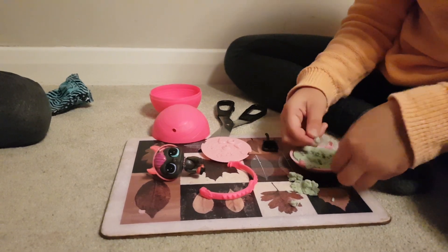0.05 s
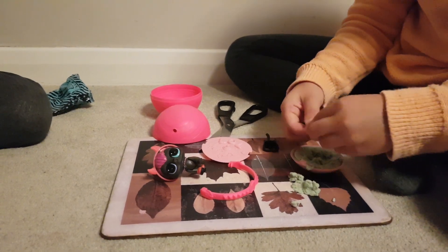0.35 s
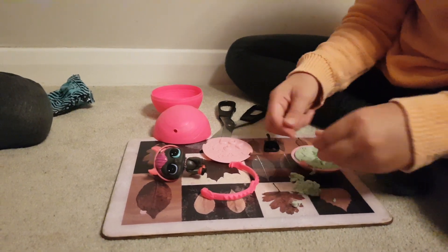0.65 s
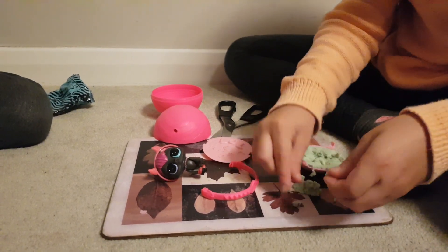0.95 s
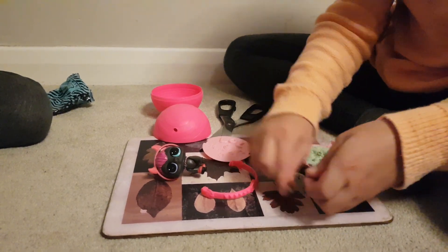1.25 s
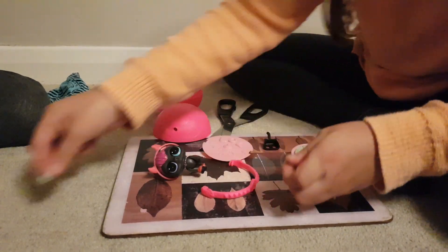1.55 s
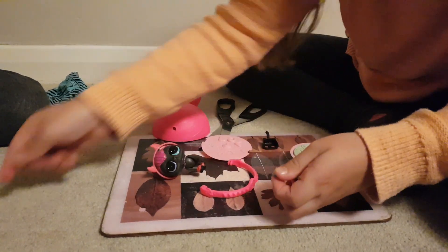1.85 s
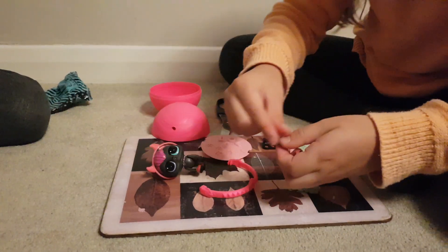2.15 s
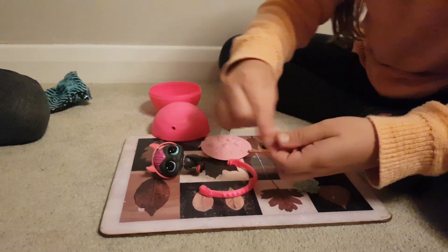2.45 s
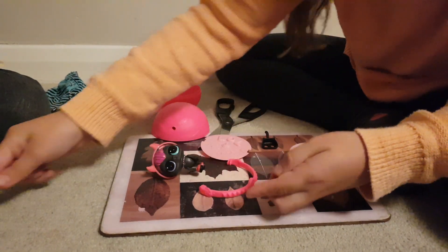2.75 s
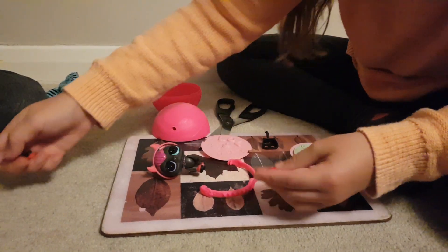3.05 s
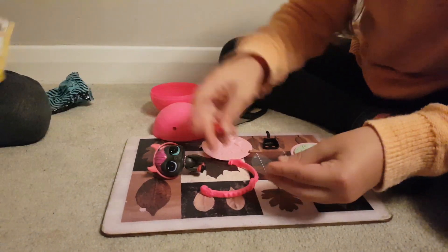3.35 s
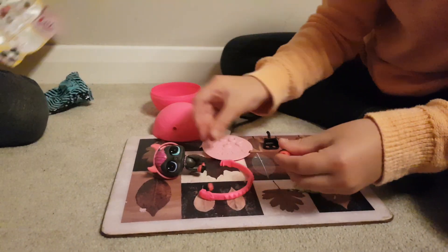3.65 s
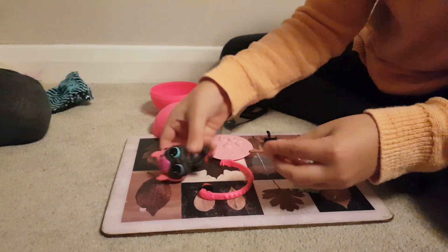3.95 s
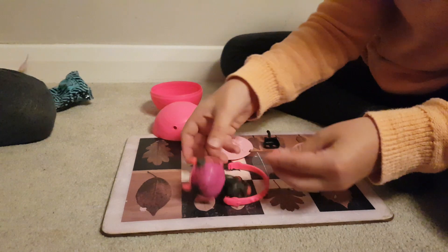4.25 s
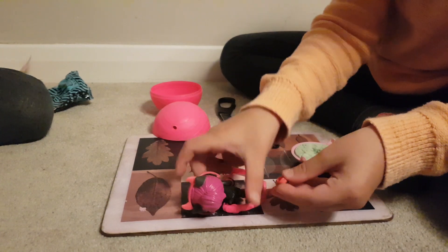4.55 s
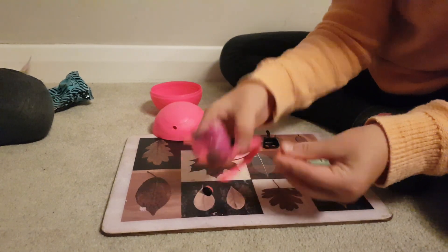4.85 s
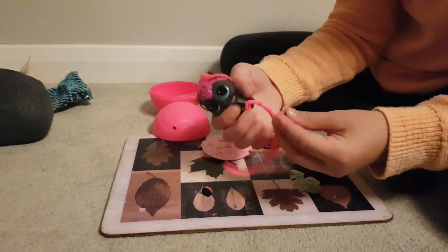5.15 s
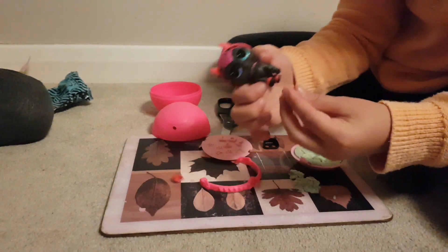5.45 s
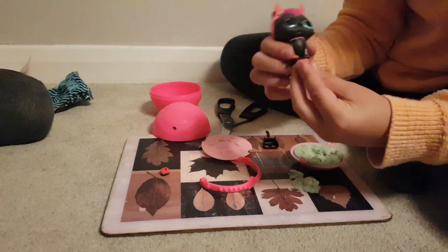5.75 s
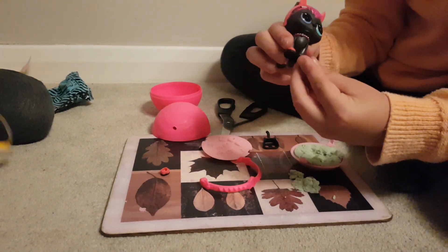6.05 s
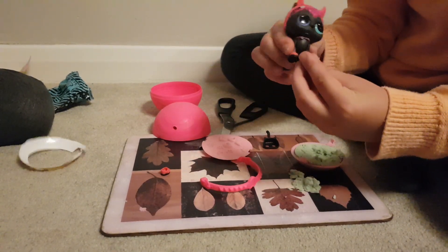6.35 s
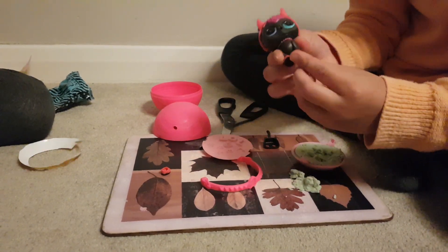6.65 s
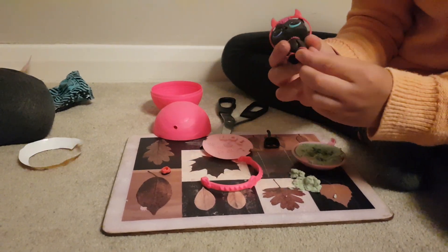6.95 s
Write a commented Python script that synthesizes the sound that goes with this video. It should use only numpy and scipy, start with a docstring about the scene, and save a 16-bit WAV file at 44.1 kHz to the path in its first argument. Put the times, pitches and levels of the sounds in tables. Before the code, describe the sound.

Soft sleeve rustle and sharp clicks of hollow plastic toys being handled, dragged and set down on a mat indoors.

```python
"""Plastic toys on a mat

Small hollow pieces are picked up, knocked together and set down on a mat on a carpeted floor. Each impact
excites the damped modes of shell and mat; dragged pieces scrape by stick and slip, and knitted sleeves
brush along. A phone close by hears it in a small, quiet room with a wall just behind."""
import sys
import numpy as np
from scipy import signal
from scipy.fft import rfft, irfft
from scipy.io import wavfile
from scipy.ndimage import map_coordinates

SR = 44100
rng = np.random.default_rng(int(sys.argv[2]) if len(sys.argv) > 2 else 0)


def transcribe(u):
    """Save the signal u as a 16-bit wav file named by the first command-line argument.

    u: samples, shape (n,) or (channels, n), limited to [-1, 1]; the rate is SR.
    q: integer samples, one column per channel.
    """
    v = np.clip(np.atleast_2d(u).T, -1, 1)
    q = np.round(v * 32767).astype(np.int16)
    wavfile.write(sys.argv[1], SR, q)


N = 313551
TIME = np.arange(N) / SR

# Spectral shapes of the noise sources: f/Hz, relative level/dB
RUMBLE_SPECTRUM = [(15, -21.5), (30, -6), (45, 3.5), (80, 2), (130, -5.5), (200, -23.5), (400, -30),
                   (900, -29), (2500, -42)]
MICROPHONE_SPECTRUM = [(200, 8.5), (700, 0), (1500, 2.5), (3200, 2), (5000, -1.5), (7000, -3.5), (9000, -1),
                       (12000, 3.5), (15500, -5)]
PAT_SPECTRUM = [(60, -25.5), (110, -12), (150, 3.5), (200, -5), (300, -5.5), (430, -18.5), (700, -16),
                (1400, -26.5), (4000, -50)]
SLEEVE_HISS_SPECTRUM = [(2500, -35), (4800, -12.5), (6200, -3), (7400, 1.5), (8500, -6), (9600, -4.5),
                        (12000, -9.5), (15500, -13)]
SLEEVE_RUB_SPECTRUM = [(500, -19.5), (1100, -10), (1800, -9), (2300, 2), (3700, 2), (4600, -6.5),
                       (7000, -32.5)]
SCRAPE_SPECTRUM = [(250, -23.5), (600, 3), (1100, -2), (1700, 3.5), (3100, -1.5), (4200, -6), (5300, -15),
                   (9000, -24.5), (15000, -22.5)]
# Reverberation bands: lower f/Hz, upper f/Hz, T60/s, relative level/dB
ROOM_BANDS = [(59.6, 300, 0.38, -2.5), (393, 1500, 0.26, 2), (1500, 8000, 0.24, -4),
              (4550, 19000, 0.27, -3.5)]
# Difference between the microphone ports for sound from the mat: f/Hz, left minus right/dB
PORT_DIFFERENCE = [(200, 0.5), (700, 1.5), (1300, 3), (2200, 4.5), (3100, 16.5), (4400, 8.5), (7000, 10.5),
                   (9200, -4.5), (11500, 0.5), (15000, 0.5)]
# Where the hands work: t/s, left lead/ms, extra left minus right/dB, mat frequency ratio, room send/dB
HAND_POSITIONS = [(0, .34, 1.5, 1.35, -7), (3.35, .29, 2, 0.99, -9), (3.58, .15, 2, 1.2, -19.5),
                  (4.13, 0.14, 1, 0.93, -14.5), (4.22, .012, 1, 1.62, -14.5), (4.34, .021, 1.5, .82, -16.5),
                  (5.29, .076, 1.5, 1.24, -15), (5.43, 0.0094, -1, 1.58, -15.5), (5.66, .11, 2, 2.4, -18)]
# Modes of the hollow plastic and of the mat on the carpet: f/Hz, resonance height/dB, T60/s
SHELL_MODES = [(730.4, -5, 0.016), (1395, -3.5, 0.0068), (1550, -6, 0.017), (1650, -6, 0.089),
               (2000, -6, 0.032), (1990, -1, 0.025), (2860, 0.5, 0.027), (3280, -5, 0.0044),
               (3700, 1.5, .018), (6470, -3.5, 0.0077), (7250, 1, 0.01), (8640, -3.5, 0.0084)]
MAT_MODES = [(86.45, -19, .12), (161, -1.5, 0.056), (228, -4.5, 0.029), (309.1, -9, 0.018)]
# A brief low groan: t/s, f/Hz, level/dB, second harmonic/dB re fundamental
GROAN_CONTOUR = [(2.28, 87.3, -68, -18), (2.31, 87.7, -53.5, -21), (2.35, 89.7, -46, -21),
                 (2.38, 76.3, -51, -9), (2.405, 81, -49, -4.5), (2.43, 73.3, -55, -27),
                 (2.46, 72, -58, -11)]
# Weight put on hands and knees: start t/s, duration/s, level/dB
WEIGHT_SHIFTS = [(-.03, 0.028, -44.5), (.53, 0.28, -67.5), (1.7, 0.014, -57), (2.21, 0.023, -59),
                 (3.045, .1, -51.5), (3.18, 0.071, -62), (3.48, 0.052, -52), (3.79, .25, -52),
                 (4.13, 0.098, -42), (4.3, 0.091, -51.5), (4.53, 0.067, -67.5), (4.72, 0.045, -61.5),
                 (5.3, 0.053, -50)]
# Arm movements: fastest at t/s, time scale/s, hiss level/dB, coarse rub/dB re hiss
ARM_MOVEMENTS = [(0.203, 0.14, -65, -6.5), (.37, 0.24, -66.5, -10), (0.686, 0.24, -69.5, 1),
                 (0.839, 0.085, -64, -15), (1.004, 0.16, -73, -4.5), (1.393, 0.14, -63, -3),
                 (1.57, 0.3, -73.5, -0.5), (1.847, 0.15, -66.5, -2.5), (2.604, 0.097, -66, -3.5),
                 (2.69, 0.069, -73.5, 3.5), (2.795, 0.16, -64, -2), (3.1, 0.087, -65.5, -12),
                 (3.179, 0.057, -60.5, 0.5), (3.316, 0.026, -54.5, -3), (3.441, 0.057, -59, 2),
                 (3.867, 0.15, -58.5, 0), (4.074, 0.11, -67.5, 2), (4.528, .28, -75.5, 4.5),
                 (6.11, 0.12, -72.5, -13), (6.39, 0.05, -72.5, -11.5)]
# Fingers rubbing a toy or the mat: centre t/s, half-amplitude duration/s, f/Hz, relative level/dB
FINGER_RUBS = [(.03, 0.06, 156, -56), (.732, .043, 3180, -58.5), (.78, 0.057, 195, -59.5),
               (1.116, .038, 1400, -66), (1.483, .022, 236, -64.5), (2.805, 0.018, 272, -59.5),
               (3.503, 0.0337, 172, -45), (4.715, 0.047, 1440, -54.5), (4.7, 0.02, 3970, -55.5),
               (5.194, .044, 3630, -70)]
# Plastic dragged over plastic and mat: start t/s, duration/s, level/dB
DRAGS = [(3.1, 0.18, -62.5), (3.52, 0.34, -55.5), (3.81, 0.27, -53.5), (4.305, 0.069, -45),
         (4.385, 0.074, -60), (4.565, 0.051, -64), (4.683, 0.085, -55), (4.835, 0.04, -64),
         (5.3, 0.026, -47), (5.435, 0.028, -41.5), (5.56, .09, -52.5), (5.66, 0.082, -72)]
# Soft bumps of a toy on the mat: t/s, strength/dB, hollow knock/dB re strength
MAT_BUMPS = [(.5021, -24, 7), (0.5467, -26, 16), (3.1118, -20.5, 4), (3.5207, -17.5, 7.5), (3.821, -16, 5),
             (3.8414, -16, 9), (3.9847, -14.5, 8)]
# Tiny hard parts and fingernails: t/s, strength/dB, hollow knock/dB, hard tick/dB (last two re strength)
SMALL_TICKS = [(.4106, -32.5, -5, 3), (1.3073, -37.5, 1, 5), (1.4853, -19.5, -19, -11),
               (1.5245, -19.5, -11, -11), (1.6685, -21.5, -4, -10), (2.4735, -24.5, -11, -19.5),
               (2.8382, -24.5, -21, -4.5), (2.9043, -23, -12, -8.5), (5.0109, -20, -28.5, -6.5),
               (5.0471, -23, -30.5, -8.5)]
# Plastic on plastic: t/s, strength/dB, ring f/Hz, hollow knock/dB, hard tick/dB, mat thump/dB
# (last three re strength)
TOY_IMPACTS = [(1.1327, -26, 2120, -4, -39, -21), (2.2086, -12.5, 3030, 1, -16, -1),
               (3.2144, 3.5, 2580, -11.5, -12.5, -8), (3.2789, -5, 2240, -6, -22, -20),
               (3.351, 3, 2870, -19, -13.5, -24), (3.5934, 14, 2900, -8, -32.5, -13),
               (3.657, 10.5, 2903, -11, -24, -18.5), (3.691, -10, 2000, -1, -24, -4),
               (3.708, 2, 2500, -8, -27.5, -18), (3.7359, -7.5, 2630, -3.5, -23, -28),
               (4.1325, 18, 2750, -13, -40, -14), (4.135, 3.5, 3000, -26, -6.5, 19.5),
               (4.148, -4, 2710, -5, -34, 8), (4.1974, -3.5, 2540, -16, -35, -12),
               (4.2158, 19, 2650, -8.5, -22.5, -6), (4.2225, 9.5, 2500, -5.5, -24.5, -13),
               (4.245, 2, 2770, -5, -27, -19), (4.3132, -10, 2270, 6, -15, -15),
               (4.3184, -0.5, 2780, -4, -35, 7), (4.3284, 5, 2470, -5.5, -24, 7),
               (4.3358, 5.5, 2360, -13.5, -39, -8), (4.3647, -6.5, 2930, -14.5, -44, -6),
               (4.382, -3.5, 2250, -5.5, -38, 7), (4.7442, -3, 2450, -6, -30.5, -10.5),
               (5.293, 10.5, 2360, -1, -24, 4.5), (5.3097, 7.5, 2540, -4, -29.5, 2),
               (5.3277, -5, 2040, 5, -41, 5), (5.3892, -3.5, 2280, -5.5, -32, 0),
               (5.3928, 7.5, 3030, -6, -22, -28), (5.411, -0.5, 2200, -2, -28, -1),
               (5.4258, -3, 1975, -12, -29.5, -3), (5.4329, 15, 2920, -5, -14.5, 0),
               (5.4432, 5.5, 3100, -15.5, -20, -26), (5.6562, -2.5, 2970, -6.5, -15.5, -26.5),
               (5.6859, -11.5, 2890, -7.5, -13.5, -20), (6.5775, -31.5, 2420, -14.5, -24, -5),
               (6.6119, -28.5, 2340, -11.5, -29, -2)]


def gain(db):
    """Amplitude ratio of a level in decibels."""
    return 10 ** (np.asarray(db) / 20)


def unit_rms(x):
    """Normalisation to an rms of 1."""
    return x / np.sqrt(np.mean(x ** 2))


def decay(t, t60):
    """Exponential decay by 60 dB in t60 seconds."""
    return np.exp(-np.log(1000) * t / t60)


def curves(table, t=TIME):
    """Linear interpolation of a table's columns in time."""
    times, *columns = np.transpose(table)
    return [np.interp(t, times, column) for column in columns]


def add(out, sound, start_s):
    """Superposition of a sound from a given time on."""
    i = max(int(start_s * SR), 0)
    out[:, i:i + sound.shape[1]] += sound[:, :max(N - i, 0)]


def band(x, lo_hz, hi_hz):
    """Band-pass filter of third order."""
    edges_hz = [lo_hz, min(hi_hz, SR / 2 - 1)]
    return signal.sosfilt(signal.butter(3, edges_hz, "band", fs=SR, output="sos"), x)


def colour(x, points, size=2048):
    """Minimum-phase filter through points (f/Hz, level/dB); causality keeps attacks sharp."""
    hz, db = np.transpose(points)
    f = np.maximum(np.fft.rfftfreq(size, 1 / SR), 1)
    magnitude = gain(np.interp(np.log(f), np.log(hz), db))
    cepstrum = irfft(np.log(magnitude))
    cepstrum[1:size // 2] *= 2
    cepstrum[size // 2 + 1:] = 0
    response = irfft(np.exp(rfft(cepstrum)))
    return signal.fftconvolve(np.atleast_2d(x), response[None], axes=1)[:, :x.shape[-1]]


def wander(rate_hz):
    """Random modulation: straight lines between normally distributed values."""
    knots = rng.standard_normal(4096)
    return np.interp(TIME * rate_hz, np.arange(len(knots)), knots)


def slips(per_s, spread_db):
    """Friction as shot noise: impulses at random moments, a few much stronger than the rest."""
    size = gain(spread_db * np.minimum(rng.exponential(size=N), np.pi))
    occurs = rng.random(N) < per_s / SR
    return unit_rms(occurs * size * rng.standard_normal(N))


def port_noise(count, coherent_hz):
    """Spatial coherence: long waves reach two nearby ports alike, short ones differ."""
    low, high = (signal.butter(2, coherent_hz, kind, fs=SR, output="sos") for kind in ("low", "high"))
    common = signal.sosfilt(low, rng.standard_normal(count))
    return common + signal.sosfilt(high, rng.standard_normal((2, count)))


def stroke_envelope(rows, attack_s, release_s, sag_db_per_s):
    """Incoherent movements add in power; each swells, eases off while it lasts and dies away."""
    power = np.zeros(N)
    for start, length, db in rows:
        since = np.maximum(TIME - start, 0)
        swell = np.sin(np.pi / 2 * np.minimum(since / attack_s, 1)) ** 2
        ease_db = sag_db_per_s * (length / 2 - np.minimum(since, length))
        release = np.exp(-np.maximum(since - length, 0) / release_s)
        power += (gain(db + ease_db) * swell * release) ** 2
    return np.sqrt(power)


def noise_floor(rumble_db=-68.5, incoherent_db=-13, hiss_db=-75):
    """The house's rumble is nearly coherent at the ports; each microphone's self-noise is independent."""
    excitation = rng.standard_normal(N) + gain(incoherent_db) * rng.standard_normal((2, N))
    rumble = unit_rms(colour(excitation, RUMBLE_SPECTRUM))
    hiss = unit_rms(colour(rng.standard_normal((2, N)), MICROPHONE_SPECTRUM))
    return rumble * gain(rumble_db + 1.7 * wander(3)) + hiss * gain(hiss_db)


def room(x, wall_delay_s=0.011, wall_db=-3, wall_t60=0.032, wall_top_hz=5500, build_s=0.067):
    """Reverberation: a scattered early reflection from the near wall, then a short diffuse tail."""
    t = np.arange(2 * SR // 3) / SR
    tail = sum(band(port_noise(len(t), coherent_hz=840), lo, hi) * decay(t, t60) * gain(db)
               for lo, hi, t60, db in ROOM_BANDS)
    tail *= 1 - decay(t, build_s)
    since = np.maximum(t - wall_delay_s, 0)
    reflection = band(port_noise(len(t), coherent_hz=775), 150, wall_top_hz)
    reflection *= decay(since, wall_t60) * (1 - decay(since, 0.0022))
    response = (unit_rms(tail) + gain(wall_db) * unit_rms(reflection)) / np.sqrt(len(t))
    return signal.fftconvolve(x, response, axes=1)[:, :N]


def ports(x):
    """Time and level differences: the left port faces the toys and hears them earlier and brighter."""
    lead_ms, side_db = curves(HAND_POSITIONS)[:2]
    hz, difference_db = np.transpose(PORT_DIFFERENCE)
    left_db = 10 * np.log10(2 / (1 + gain(-2 * difference_db)))  # the two filters conserve total power
    left = colour(x[0], np.c_[hz, left_db])[0]
    right = colour(x[1], np.c_[hz, left_db - difference_db])[0]
    delayed_right = map_coordinates(right, [np.arange(N) - lead_ms * SR / 1000], order=3)
    return np.array([left, delayed_right * gain(-side_db)])


def groan(waver=0.02, third_db=-4):
    """A short, low tone with random frequency modulation gains harmonics as it sinks."""
    hz, db, overtone_db = curves(GROAN_CONTOUR)
    phase = 2 * np.pi * np.cumsum(hz * (1 + waver * wander(70))) / SR
    overtones = np.sin(2 * phase) + gain(third_db) * np.sin(3 * phase)
    tone = np.sin(phase) + gain(overtone_db) * overtones
    sounding = (TIME > GROAN_CONTOUR[0][0]) & (TIME < GROAN_CONTOUR[-1][0])
    return np.sqrt(2) * tone * gain(db) * sounding


def hands_and_knees(sleeve_rub, deep_db=-8, arm_db=-4, rest_db=-83):
    """Soft contacts excite mainly low frequencies: dull pats follow arm movements and shifts of weight."""
    pats = unit_rms(colour(slips(per_s=700, spread_db=3), PAT_SPECTRUM))
    mat_ratio = curves(HAND_POSITIONS)[2]
    deep = unit_rms(band(rng.standard_normal(N), 75, 140)) / mat_ratio ** 4  # weight on the floor
    weight = stroke_envelope(WEIGHT_SHIFTS, attack_s=0.044, release_s=0.031, sag_db_per_s=15)
    envelope = np.sqrt(weight ** 2 + (gain(arm_db) * sleeve_rub) ** 2 + gain(rest_db) ** 2)
    return (pats + gain(deep_db) * deep) * envelope


def arm_envelopes(skew=1.2, steepness=1.25, rest_db=-84):
    """Friction noise follows speed: sleeve hiss and rub rise as an arm speeds up and fall as it slows."""
    hiss_power = rub_power = gain(rest_db) ** 2
    for fastest, length, hiss_db, rub_db in ARM_MOVEMENTS:
        progress = 2 * (TIME - fastest) / length / np.where(TIME > fastest, skew, 1 / skew)
        power = np.exp(2 * steepness * (1 - np.hypot(1, progress)))
        hiss_power += power * gain(hiss_db) ** 2
        rub_power = rub_power + power * gain(hiss_db + rub_db) ** 2
    return np.sqrt(hiss_power), np.sqrt(rub_power)


def sleeves(hiss_envelope, rub_envelope, incoherent=0.99, pan_db=2, brisk_db=-58, sizzle_db=-6):
    """Friction of knitted fibres: a fine hiss, brighter when brisk, and a coarse rub where cloth presses."""
    fibres = unit_rms(slips(per_s=5200, spread_db=4.5) + incoherent * rng.standard_normal((2, N)))
    hiss = unit_rms(colour(fibres, SLEEVE_HISS_SPECTRUM)) * gain(1.7 * wander(28))
    rub = unit_rms(colour(fibres, SLEEVE_RUB_SPECTRUM)) * gain(3.2 * wander(45))
    flicks = slips(per_s=2000, spread_db=6.5) + incoherent * rng.standard_normal((2, N))
    sizzle = unit_rms(band(flicks, 8000, 12500))
    hiss += sizzle * gain(sizzle_db) * np.sqrt(hiss_envelope / gain(brisk_db))
    return (hiss * hiss_envelope + rub * rub_envelope) * gain([[pan_db], [-pan_db]])


def finger_rubs(relative_bandwidth=0.23):
    """Friction drives one resonance of a toy or the mat, giving a short swell of narrow-band noise."""
    out = np.zeros((2, N))
    for middle, length, hz, db in FINGER_RUBS:
        count = int(2 * length * SR)
        friction = rng.standard_normal(SR // 2 + count)  # the extra half second lets the filter settle
        resonance = band(friction, hz * (1 - relative_bandwidth / 2), hz * (1 + relative_bandwidth / 2))
        swell = unit_rms(resonance[-count:] * np.hanning(count))
        add(out, swell[None] * gain(db) / 2, middle - length)
    return out


def modal_ring(modes, t, scatter_db, detune, ratio=1):
    """Free vibration is a sum of damped modes; each blow lands on another spot and weights them anew."""
    hz, db, t60 = np.transpose(modes)[:, :, None]
    weight, shift = rng.uniform(-1, 1, (2, len(modes), 1))
    amplitude = gain(db + scatter_db * weight) * 2 * np.log(1000) / (t60 * SR)
    mode_hz = hz * ratio * (1 + detune * shift)
    return np.sum(amplitude * decay(t, t60) * np.cos(2 * np.pi * mode_hz * t), axis=0)


def contact(t, chatter_t60, snap=1, chatter_db=-1, modes_db=-4, snap_hz=6500):
    """Impulse response of one blow: a rounded snap, brief chatter between the faces, the shell's ring."""
    impulse = t == 0
    push = signal.sosfilt(signal.butter(1, snap_hz, fs=SR, output="sos"), impulse)
    chatter = port_noise(len(t), coherent_hz=1900) * decay(t, chatter_t60) * (1 - decay(t, 0.0054))
    chatter *= gain(chatter_db) / np.linalg.norm(chatter, axis=1, keepdims=True)
    shell = gain(modes_db) * modal_ring(SHELL_MODES, t, scatter_db=10.5, detune=0.006)
    blow = snap * push + chatter + shell
    # scaled to the energy of a unit impulse in the band where the plastic rings
    strength = np.linalg.norm(band(blow, 1400, 4500), axis=1, keepdims=True)
    return -blow * np.linalg.norm(band(impulse, 1400, 4500)) / strength


def scraping():
    """Stick-slip friction: edges catch and let go, driving the shell with a run of tiny, dry blows."""
    force = slips(per_s=320, spread_db=2.5) * gain(2 * wander(60))
    response = contact(np.arange(SR // 12) / SR, chatter_t60=0.012, chatter_db=-2.5, modes_db=-9.5)
    shell = signal.fftconvolve(force[None], response, axes=1)[:, :N]
    envelope = stroke_envelope(DRAGS, attack_s=0.01, release_s=0.0069, sag_db_per_s=20)
    return unit_rms(colour(shell, SCRAPE_SPECTRUM)) * envelope


def ticks(ring_hz=3300, thump_db=-2):
    """Impact rows for tiny parts: small, stiff bodies ring high."""
    return [(s, db, ring_hz, knock_db, tick_db, thump_db) for s, db, knock_db, tick_db in SMALL_TICKS]


def bumps(ring_hz=2300, tick_db=-21, thump_db=18):
    """Impact rows for cushioned blows: the compliant mat leaves mostly thump and hollow knock."""
    return [(s, db, ring_hz, knock_db, tick_db, thump_db) for s, db, knock_db in MAT_BUMPS]


def dropped_piece(drop_s=5.4674, drop_db=1.5, first_flight_s=0.032, restitution=0.735, rocking_s=0.012,
                  loss_db_per_halving=7, loss_db_per_s=32.5, contacts=21,
                  ring_hz=2630, knock_db=-4, tick_db=-26, thump_db=-28):
    """Impact rows for inelastic bounces: each is shorter and weaker, until the piece rocks on its rim."""
    rows, s = [], drop_s
    for k, (late, strong) in enumerate(np.clip(rng.standard_normal((contacts, 2)), -2, 2)):
        flight_s = first_flight_s * restitution ** k
        gap_s = max(flight_s, rocking_s)
        db = drop_db + loss_db_per_halving * np.log2(gap_s / first_flight_s)
        db -= loss_db_per_s * (s - drop_s)
        if flight_s < rocking_s:  # rocking is softer, and uneven in level and timing
            db += 3 * strong - 2
            gap_s *= 1 + 0.35 * late
        rows.append((s, db, ring_hz, knock_db, tick_db, thump_db))
        s += gap_s
    return rows


def impacts(graze_db=-28, firm_db=10):
    """Impacts excite shell and mat, firmer ones more brightly; returns direct sound and room send."""
    direct, room_send = np.zeros((2, 2, N))
    t = np.arange(SR // 6) / SR
    for start, db, hz, knock_db, tick_db, thump_db in TOY_IMPACTS + ticks() + bumps() + dropped_piece():
        # a toy knocked in the hand thumps higher, with less bass, than one pressed on the mat
        mat_ratio, room_db = curves(HAND_POSITIONS, start)[2:]
        bass_ratio = min(np.sqrt(mat_ratio), np.pi / 2)
        mat = modal_ring(MAT_MODES, t, scatter_db=-4.5, detune=0.13, ratio=mat_ratio)
        thump = gain(thump_db) * band(mat, 75 * mat_ratio ** 2, 420 * mat_ratio)
        # a firm blow has more snap, longer chatter and more treble than a graze
        firmness = np.clip((db - graze_db) / (firm_db - graze_db), 0, 1)
        blow = contact(t, chatter_t60=0.0091 + 0.0074 * firmness ** 2, snap=np.sqrt(firmness))
        knock_shape = [(100 * bass_ratio ** 2, knock_db - 27.5), (330 * bass_ratio, knock_db - 16),
                       (570, knock_db + 1), (760, knock_db + 1), (1080, knock_db - 1)]
        ring_shape = [(0.58 * hz, 0.28 * knock_db), (hz, 2), (1.362 * hz, -2.5)]
        tick_shape = [(5300, tick_db + 7.5), (7500, tick_db + 6),
                      (11000, tick_db - 4.5 + 5 * firmness ** 2),
                      (16000, tick_db - 17.5 + 16 * firmness ** 4)]
        sound = gain(db) * (colour(blow, knock_shape + ring_shape + tick_shape) + thump)
        add(direct, sound, start)
        add(room_send, sound * gain(room_db), start)
    return direct, room_send


def scene(handling_room_db=-13, impact_room_db=-1):
    """Direct and reverberant sound of toys, hands and sleeves superpose on the noise floor."""
    knocks, room_send = impacts()
    sleeve_hiss, sleeve_rub = arm_envelopes()
    handling = scraping() + finger_rubs() + sleeves(sleeve_hiss, sleeve_rub) + hands_and_knees(sleeve_rub)
    reverberation = room(gain(impact_room_db) * room_send + gain(handling_room_db) * handling)
    return ports(knocks + handling + groan() + reverberation) + noise_floor()


def record(dry, low_hz=28, top_hz=16250):
    """Band limiting and clipping: the phone drops the deepest rumble and the top, and stops at full scale."""
    high_pass = signal.butter(2, low_hz, "high", fs=SR, output="sos")
    low_pass = signal.ellip(8, 0.2, 70, top_hz, fs=SR, output="sos")
    return np.clip(signal.sosfilt(low_pass, signal.sosfilt(high_pass, dry)), -1, 1)


dry = scene()
out = record(dry)
transcribe(out)
```